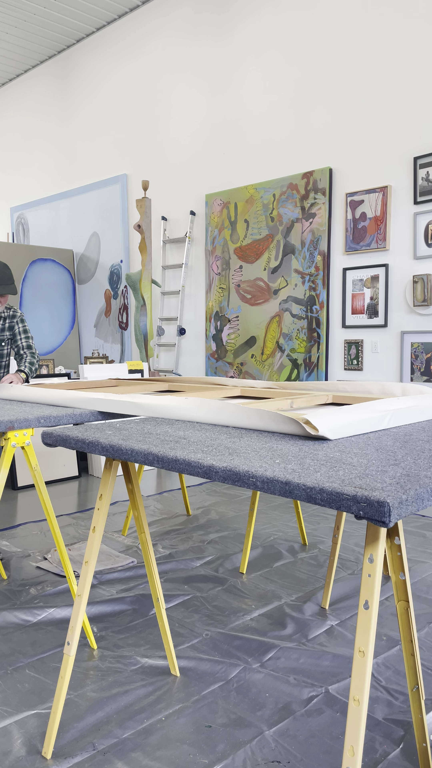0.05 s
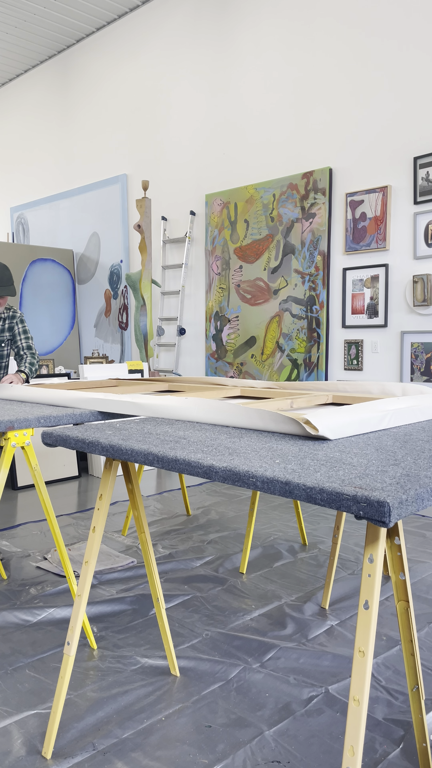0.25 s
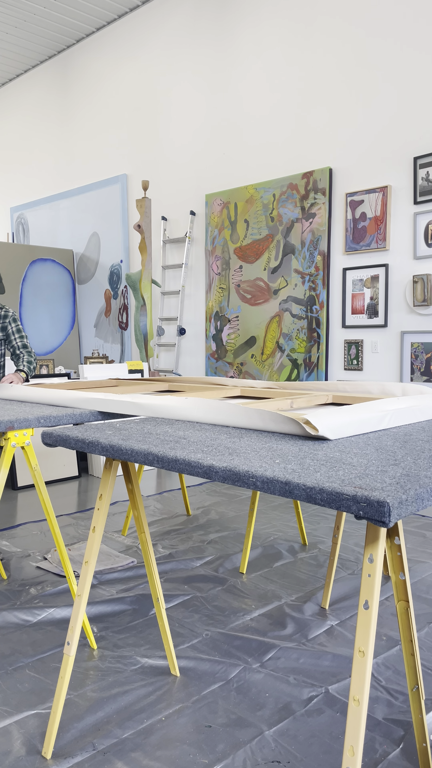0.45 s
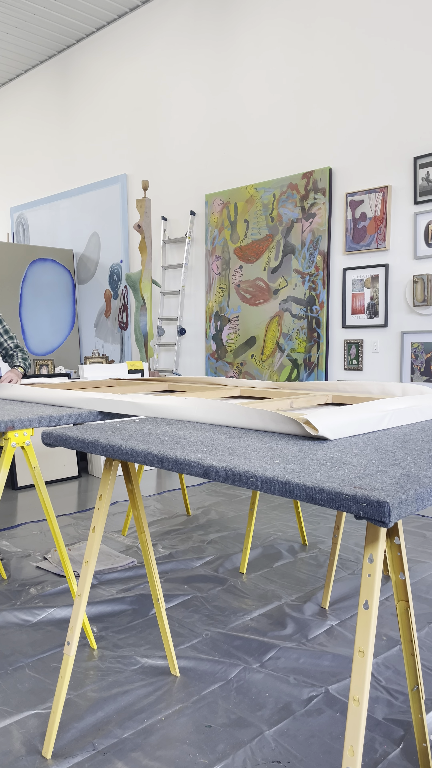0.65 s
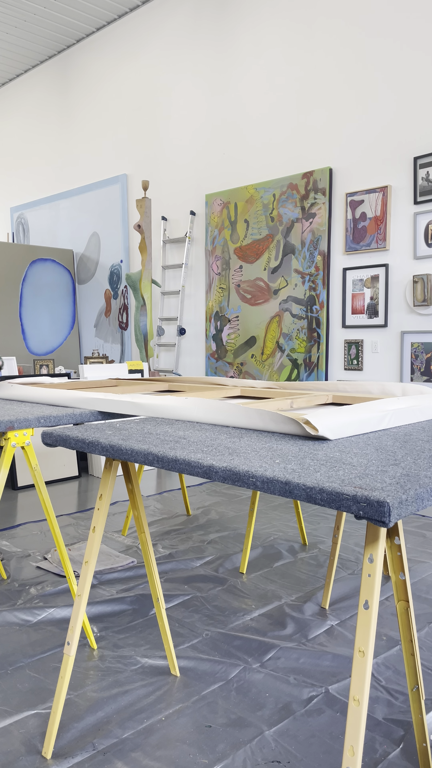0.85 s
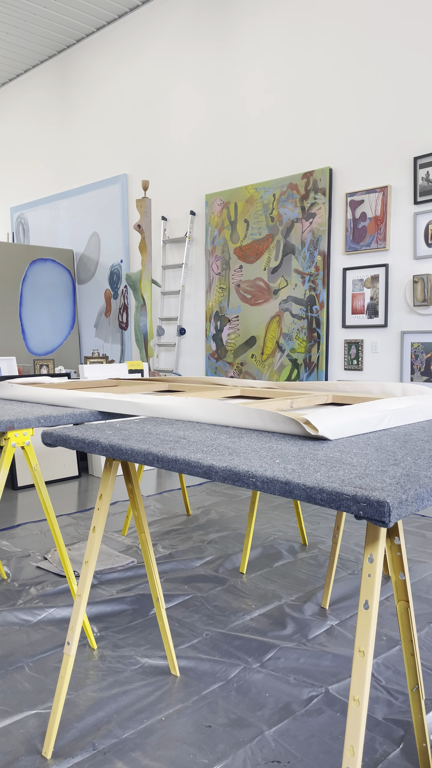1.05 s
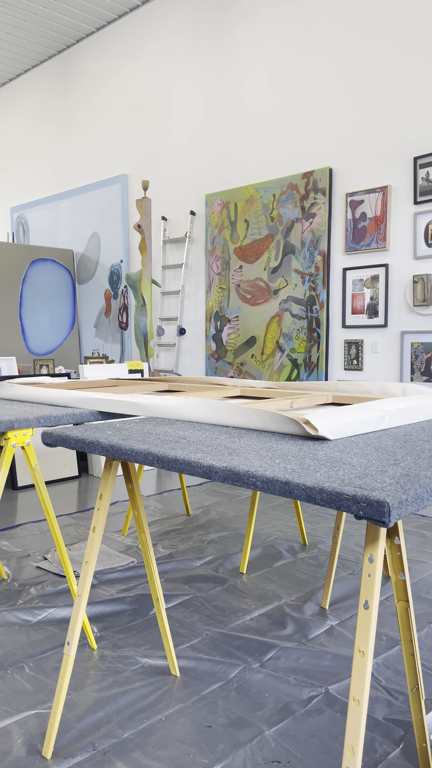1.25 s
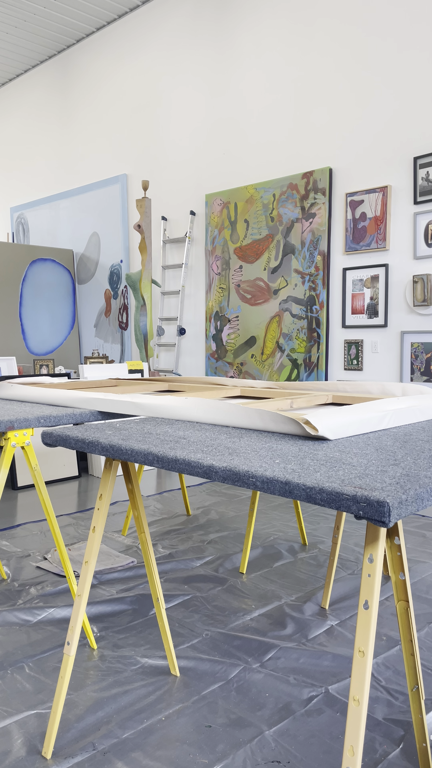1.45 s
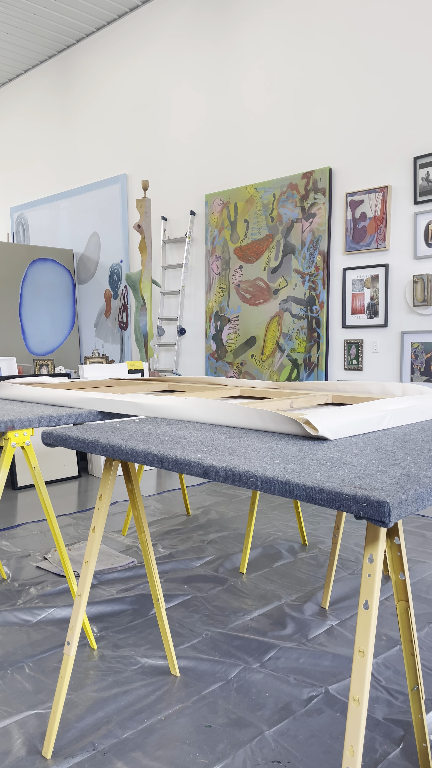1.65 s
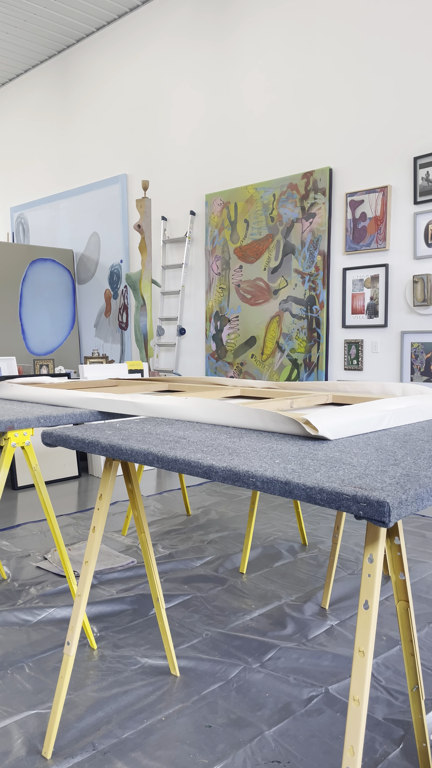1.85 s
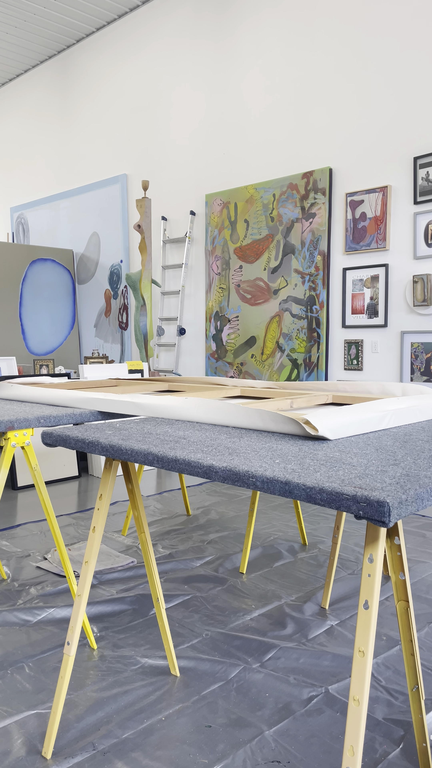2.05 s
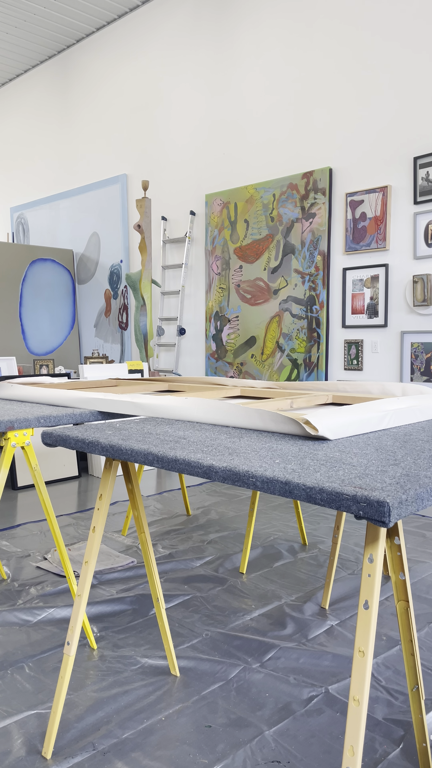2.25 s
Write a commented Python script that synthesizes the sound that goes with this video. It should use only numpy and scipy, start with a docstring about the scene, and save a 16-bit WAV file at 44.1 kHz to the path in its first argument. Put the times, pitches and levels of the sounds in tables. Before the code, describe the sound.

One abrupt, snappy bang of metal and wood, preceded by soft canvas thuds, rings for about a second in a big reverberant room; light taps and cloth rubs follow quietly, picked up in stereo across the room.

```python
"""Dull bumps of a handled canvas come first, then one loud bang, like a staple gun fired into a wooden stretcher.
The bang rings through a large, hard-walled studio; small clicks and rustling cloth follow, over a ventilation hum.
Struck wood, canvas and frame are damped sines; snaps, ticks, rubs and air are coloured noise.
The room is a decaying stereo noise response that bang, bumps, clicks and rubs share."""
import sys
import numpy as np
from scipy import signal
from scipy.fft import rfft, irfft, next_fast_len
from scipy.io import wavfile
from scipy.ndimage import uniform_filter1d

SR = 44100
rng = np.random.default_rng(int(sys.argv[2]) if len(sys.argv) > 2 else 0)


def generate_wav(signal):
    """Clip the signal to [-1, 1] and save it as 16-bit WAV at the path in sys.argv[1]."""
    frames = np.transpose(np.atleast_2d(signal))
    scaled = np.clip(frames, -1, 1) * 32767
    pcm = np.round(scaled).astype(np.int16)
    wavfile.write(sys.argv[1], SR, pcm)


N = 101429
SIZE = next_fast_len(N + 8192, real=True)  # padded length for the transforms
FREQS = np.fft.rfftfreq(SIZE, 1 / SR)
ROOM_BUILD_S, CONTACT_S = 0.013, 0.0016  # attacks: room build-up, contact with wood or frame

# width of diffuse sound: freq_hz, side_minus_mid_db
STEREO_WIDTH = [(60, -17.5), (170, -12), (330, -10), (620, 0), (1200, -2.5), (2800, -3), (6500, -3),
                (8500, 3.5), (10400, 23), (12300, 1), (14500, -11.5)]
# modes of the stretched canvas: pitch_hz, level_db, t60_s
CANVAS_MODES = [(58, -5, 0.19), (82, -4.5, 0.2), (96, -5.5, 0.048), (153, -2.5, 0.33), (163, -3.5, 0.15),
                (229, -1, 0.22), (335, -7, 0.47), (392, 2, 0.19)]
# colour of a canvas bump in the room: freq_hz, level_db
BUMP_COLOUR = [(25, -23), (50, -8.5), (150, 5), (380, 1.5), (500, -8), (1000, -20), (2000, -38),
               (6000, -53)]


def amp(db):
    """Decibels to gain."""
    return 10 ** (np.asarray(db) / 20)


def along(points, hz):
    """Read a (Hz, value) table on a log-frequency axis."""
    f, v = np.array(points, float).T
    return np.interp(np.log(np.maximum(hz, 1)), np.log(f), v)


def clock():
    """Time of each sample in seconds."""
    return np.arange(N) / SR


def rise(s):
    """Linear attack over s seconds."""
    return np.clip(clock() / max(s, 1e-4), 0, 1)


def fade(t60):
    """Exponential decay that falls 60 dB in t60 seconds."""
    return np.exp(-np.minimum(np.log(1000) * clock() / max(t60, 1e-3), 60))


def walk(per_s):
    """A random wander, spread near 1, through per_s new targets a second."""
    return np.interp(clock() * per_s, np.arange(256), rng.standard_normal(256))


def delay(x, s):
    """Start a sound s seconds later."""
    k = int(np.clip(s * SR, 0, N - 1))
    silence = np.zeros(x.shape[:-1] + (k,))
    return np.concatenate([silence, x[..., :N - k]], axis=-1)


def pan(x, db):
    """Place a sound left (+) or right (-)."""
    return x * amp(np.array([[db], [-db]]) / 2)


def strike(x, db):
    """Scale a short sound to the energy of 10 ms at the given level."""
    energy = np.mean(np.sum(x ** 2, axis=-1))
    return x * amp(db) * np.sqrt(.01 * SR / energy)


def high_pass(x, hz):
    """Gently take away what lies below hz."""
    return signal.sosfilt(signal.butter(2, hz, "high", fs=SR, output="sos"), x)


def low_pass(x, hz):
    """Take away what lies above hz, steeply."""
    return signal.sosfilt(signal.butter(8, min(hz, .45 * SR), fs=SR, output="sos"), x)


def shape(x, points):
    """Give a sound a (Hz, dB) colour with a causal, minimum-phase filter."""
    cepstrum = irfft(np.log(amp(along(points, FREQS))), SIZE)
    # folding the cepstrum forward in time makes the filter causal
    cepstrum[1:SIZE // 2] *= 2
    cepstrum[SIZE // 2 + 1:] = 0
    response = np.exp(rfft(cepstrum))
    return irfft(rfft(x, SIZE) * response, SIZE)[..., :N]


def through(x, response):
    """Send a sound through a stereo response."""
    return signal.fftconvolve(np.atleast_2d(x), response, axes=-1)[:, :N]


def diffuse():
    """Stereo noise whose width at each frequency follows the side-to-mid table."""
    mid, side = rfft(rng.standard_normal((2, SIZE)))
    w = amp(along(STEREO_WIDTH, FREQS))
    sides = np.array([mid + w * side, mid - w * side])
    return irfft(sides / np.hypot(1, w), SIZE)[:, :N]


def modes(table):
    """Damped sines of a struck object."""
    return sum(amp(db) * np.sin(2 * np.pi * hz * clock()) * fade(t60) for hz, db, t60 in table)


def tilted(table, tilt_db):
    """Tilt the levels of a (Hz, dB, ...) table by tilt_db per octave."""
    return [(hz, level + tilt_db * np.log2(hz), *rest) for hz, level, *rest in table]


def metal_snaps():
    """Metal parts of the shot: bursts of coloured, decaying noise."""
    # snaps of the shot: start_s, level_db, t60_s
    snap_times = [(0.2071, -43.5, 0.025), (0.214, -43.5, 0.018), (0.2172, -39, 0.021),
                  (0.2199, -23, 0.0084), (0.223, -23.5, 0.012), (0.2219, -28.5, 0.0099)]
    # colour of a snap: freq_hz, level_db
    snap_colour = [(120, -30), (600, -8), (1500, -3.5), (3400, 2), (5000, -7), (6800, -1), (8000, -7),
                   (11500, -2.5), (14500, -13), (16000, -28)]
    return sum(delay(strike(shape(diffuse() * fade(t60), snap_colour), db), s)
               for s, db, t60 in snap_times)


def stretcher_blows():
    """The wooden stretcher takes the blows and answers with short damped modes."""
    # blows on the stretcher: start_s, level_db
    blow_times = [(0.213, -34.5), (0.2204, -17), (0.2243, -16.5)]
    # modes of the stretcher: pitch_hz, level_db, t60_s
    wood_modes = [(260, -11.5, 0.054), (347.5, -8.5, 0.095), (422, -9.5, 0.076), (550, -6, .025),
                  (700, -1.5, .018), (780, 1, 0.014), (898, -1, 0.026), (1001, -0.5, 0.016),
                  (1060, -8.5, .02), (1183, -15, 0.015)]
    body = high_pass(modes(wood_modes) * rise(CONTACT_S), 220)
    body = low_pass(body, 1350)
    return sum(delay(strike(body, db), s) for s, db in blow_times)


def canvas_boom():
    """The canvas booms after the blow: its modes swell in and are damped further."""
    start_s, level_db, rise_s, damping_t60_s = .226, -31.5, 0.017, 0.13
    skin = modes(CANVAS_MODES) * rise(rise_s) * fade(damping_t60_s)
    return delay(strike(skin, level_db), start_s)


def first_echoes(wood, snap):
    """Near surfaces return wood and snap as separate early reflections."""
    # reflections: delay_s, wood_level_db, snap_level_db, pan_db
    reflections = [(0.0115, -18.5, -14, 4.5), (.0250, -10, -10, -0.5), (.0335, -11.5, -13.5, 0.5)]
    out = 0
    for s, wood_db, snap_db, pan_db in reflections:
        reflected = amp(wood_db) * wood + amp(snap_db) * snap
        out = out + pan(delay(reflected, s), pan_db)
    return out


def lingering():
    """Tones in the room's tail: each swells and sinks by chance, differently at the two ears."""
    # low tones of frame and canvas: pitch_hz, level_db, t60_s
    ring_tones = [(179.4, -4, 0.65), (217.6, 1, 0.96), (248, -1.5, 0.5), (322.7, 1.5, 0.49),
                  (533.6, 7, 0.58), (555.7, -4, .7), (663, -1.5, 0.64), (755, -5, .9), (881, -2, 0.71),
                  (1030, -0.5, 0.36), (1180, -6.5, 0.92), (1203, -6.5, 0.44)]
    waver_depth, waver_per_s = 0.28, 13
    out = 0
    for hz, db, t60 in ring_tones:
        # complex wander moves both level and phase
        mid = 1 + waver_depth * (walk(waver_per_s) + 1j * walk(waver_per_s))
        side = amp(along(STEREO_WIDTH, hz)) * (walk(waver_per_s) + 1j * walk(waver_per_s)) / 2
        tone = amp(db) * np.exp(2j * np.pi * hz * clock()) * fade(t60)
        out = out + np.imag(np.array([mid + side, mid - side]) * tone)
    return out


def bang(hall):
    """Metal snaps, the stretcher takes the blow, the canvas booms, near surfaces echo and the room rings on."""
    # colour of the bang as it spreads into the room: freq_hz, level_db
    bang_colour = [(25, -35.5), (45, -24.5), (80, -7), (130, -1), (160, -2.5), (220, 1.5), (335, 1),
                   (375, -6.5), (430, -1), (560, 0), (605, -7), (660, 1), (760, -1), (900, -3), (980, -8),
                   (1040, 2), (1200, -2), (1340, -17), (1480, -8.5), (1700, -12), (2260, -6.5), (3050, -11),
                   (4000, -8.5), (4640, -9), (5050, -13.5), (5900, -9.5), (7050, -8), (7350, -13),
                   (12000, -9.5), (14500, -26), (16000, -44.5)]
    room_start_s, ring_delay_s = 0.2235, .008
    snap = metal_snaps()
    wood = stretcher_blows()
    direct = snap + pan(wood, 1.5) + canvas_boom()
    tail = strike(shape(hall, bang_colour), -8.5)
    ring = strike(lingering(), -15.5) * rise(ROOM_BUILD_S)
    spread = delay(tail + delay(ring, ring_delay_s), room_start_s)
    return direct + first_echoes(wood, snap) + spread


def bumps(hall):
    """The handled canvas sounds like a slack drum; darker bumps favour its lower modes."""
    # bumps of the canvas: start_s, level_db, brightness_db_per_octave
    bump_times = [(0.0, -26.5, -1), (0.022, -38, -2.5), (0.063, -44, -2), (0.094, -37, -4.5),
                  (0.110, -39, -6), (0.161, -44, -8)]
    rise_s, skin_db, room_db = 0.0026, -4, -8.5  # skin and room relative to each bump's level
    tail = strike(shape(hall, BUMP_COLOUR), room_db)
    out = 0
    for s, db, tilt_db in bump_times:
        skin = modes(tilted(CANVAS_MODES, tilt_db)) * rise(rise_s) ** 2
        out = out + amp(db) * delay(strike(skin, skin_db) + tail, s)
    return out


def clicks(hall):
    """Light taps of the tool on the frame: a tick, a small knock, a soft thump and a room tail."""
    # taps: start_s, level_db, brightness_db_per_octave, room_db (re level), thump_db, knock_db
    tap_times = [(1.046, -53, -1, 5, -67, -56.5), (1.5517, -56.5, 7.5, -3.5, -75, -70),
                 (2.1389, -55.5, 7.5, -4.5, -54.5, -63.5), (2.1432, -51.5, 2, 3.5, -62.5, -67.5)]
    # colour of a tick before its tilt: freq_hz, level_db
    tick_colour = [(150, -16), (400, 10), (1500, -2.5), (3000, -1), (6000, -5.5), (9000, -10), (12000, -1),
                   (15500, -45)]
    # modes of the lightly tapped frame: pitch_hz, level_db, t60_s
    frame_modes = [(443, 3, 0.067), (635, -2, 0.077), (1060, 3, 0.069), (1474, 9, 0.038), (1627, -5, 0.034),
                   (2020, 5, 0.045)]
    tick_t60_s, thump_damping_t60_s, thump_room_db = 0.02, 0.21, -3.5
    frame = modes(frame_modes) * rise(CONTACT_S)
    skin = modes(CANVAS_MODES) * rise(CONTACT_S) * fade(thump_damping_t60_s)
    thump_tail = shape(hall, BUMP_COLOUR)
    out = 0
    for s, db, tilt_db, room_db, thump_db, knock_db in tap_times:
        colour = tilted(tick_colour, tilt_db)
        tick = strike(shape(diffuse() * fade(tick_t60_s), colour), db)
        knock = strike(frame, knock_db)
        thump = strike(skin, thump_db) + strike(thump_tail, thump_db + thump_room_db)
        tail = strike(shape(hall, colour), db + room_db)
        out = out + delay(tick + knock + thump + tail, s)
    return out


def rubs(hall):
    """Grainy strokes over cloth and canvas: bands of noise, the narrowest nearly pitched, each heard in the room."""
    # strokes: start_s, length_s, swell_s, level_db, centre_hz, width_octaves, room_db
    strokes = [(1.353, .1, 0.017, -65, 120.6, 0.38, -8.5), (1.355, 0.076, 0.008, -74.5, 8650, 0.66, 2),
               (1.359, 0.072, .01, -62, 337, 0.61, -3), (1.433, 0.097, .03, -68, 230, 0.11, -5.5),
               (1.453, 0.13, 0.026, -67.5, 780, 0.58, -1), (1.473, 0.041, .01, -65, 1447, 0.1, -5),
               (1.5, 0.05, .015, -76, 2970, 0.35, 3), (1.506, 0.4, 0.033, -71, 9600, 0.43, -8),
               (1.535, 0.025, 0.013, -66.5, 1790, 0.25, -7.5), (1.627, 0.1, 0.094, -63, 5983, 2.7, 3),
               (1.633, 0.22, 0.024, -66, 780, 1.15, -6), (1.86, .5, .03, -71, 5509, 4.8, 1),
               (2.17, 0.024, .008, -61.5, 169, 1.2, -11), (2.183, 0.12, .01, -71.5, 700, 0.45, 2)]
    grain_db, grain_samples, release_s = 3, 144, 0.067
    t, hz = clock(), FREQS + 1
    near, far = 0, 0
    for s, length, swell_s, db, centre_hz, octaves, room_db in strokes:
        grain = uniform_filter1d(rng.standard_normal(N), size=grain_samples) * np.sqrt(grain_samples)
        band = np.exp(-.5 * (np.log2(hz / centre_hz) / octaves) ** 2)
        rough = diffuse() * amp(grain_db * grain)
        rub = irfft(rfft(rough, SIZE) * band, SIZE)[:, :N]
        release = np.exp(-np.maximum(t - s - length, 0) / release_s)
        stroke = delay(rise(swell_s), s) * release
        rub = amp(db) * stroke * rub / rub.std()
        near = near + rub
        far = far + amp(room_db) * rub[0]
    return low_pass(near + through(far, hall), 12800)


def room():
    """The studio's response: a short gap, a build-up, then a noise tail with its own decay in each band."""
    # decay of the room: freq_hz, t60_s
    band_decay = [(60, 1.2), (130, 0.8), (260, 1), (700, 1.235), (1200, 1.193), (2500, 1.155), (4000, 1.09),
                  (6500, 0.85), (9000, 0.64), (13500, 0.35)]
    gap_s, pan_db = 0.0021, 0.26
    noise = rfft(diffuse(), SIZE)
    tail = 0
    for k, (_, t60) in enumerate(band_decay):
        # overlapping bands, each full at its own frequency and gone at its neighbours'
        band = along([(f, j == k) for j, (f, _) in enumerate(band_decay)], FREQS)
        tail = tail + irfft(noise * band, SIZE)[:, :N] * fade(t60)
    tail = tail * delay(rise(ROOM_BUILD_S), gap_s)
    return pan(tail / np.sqrt(np.sum(tail ** 2) / 2), pan_db)


def ventilation():
    """Soft moving air as coloured noise, and a low fan hum whose level wavers slightly."""
    # colour of the air: freq_hz, level_db
    air_colour = [(25, -24), (50, 0.5), (80, -3.5), (130, -1), (200, -7), (400, -7.5), (900, -7),
                  (1500, -16.5), (3000, -34), (7000, -39), (15000, -51.5)]
    air_db, hum_hz, hum_db, waver_db, waver_per_s = -63, 78.8, -63, -1.56, 16
    air = shape(diffuse(), air_colour)
    hum_level = amp(hum_db + waver_db * walk(waver_per_s))
    hum = np.sqrt(2) * np.sin(2 * np.pi * hum_hz * clock()) * hum_level
    return amp(air_db) * air / air.std() + hum


def scene():
    """All sounds of the studio, sharing one room."""
    hall = room()
    return bang(hall) + bumps(hall) + clicks(hall) + rubs(hall) + ventilation()


def record(dry):
    """The recorder cuts the deepest bass and the top."""
    low_cut_hz, top_hz = 29, 16000
    top_cut = signal.ellip(8, .2, 80, top_hz, fs=SR, output="sos")
    return signal.sosfilt(top_cut, high_pass(dry, low_cut_hz))


dry = scene()
out = record(dry)
generate_wav(out)
```